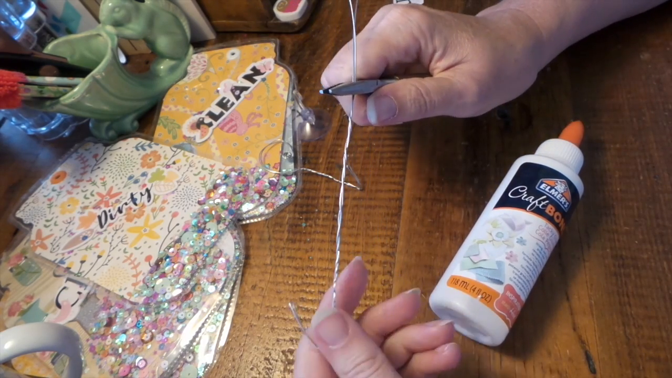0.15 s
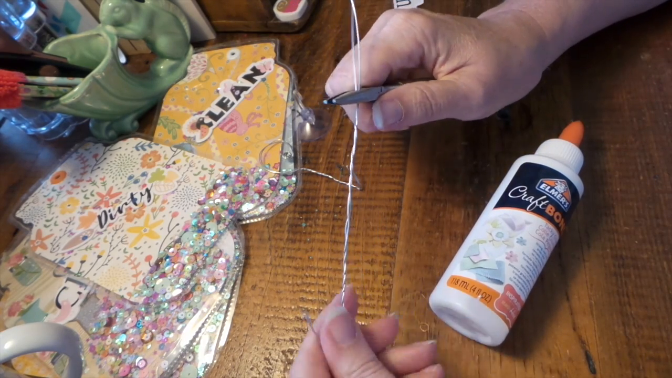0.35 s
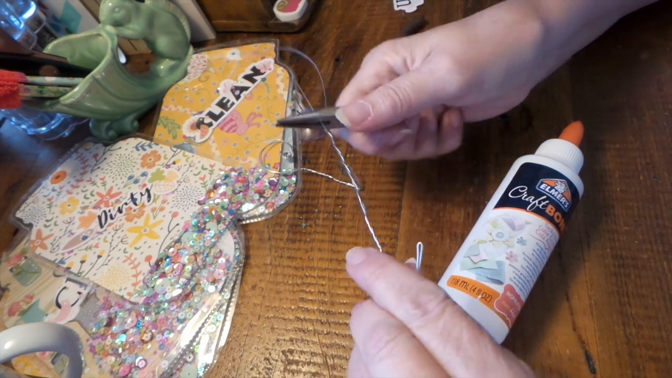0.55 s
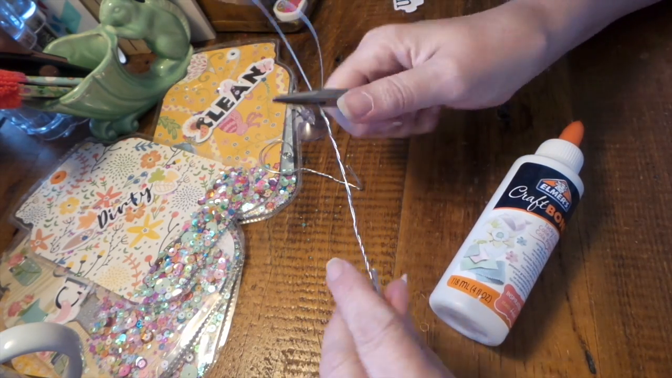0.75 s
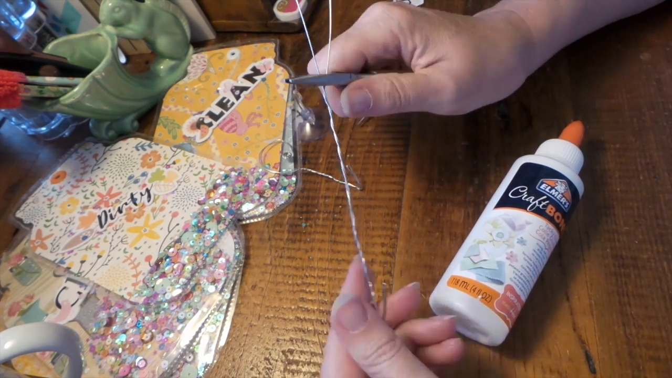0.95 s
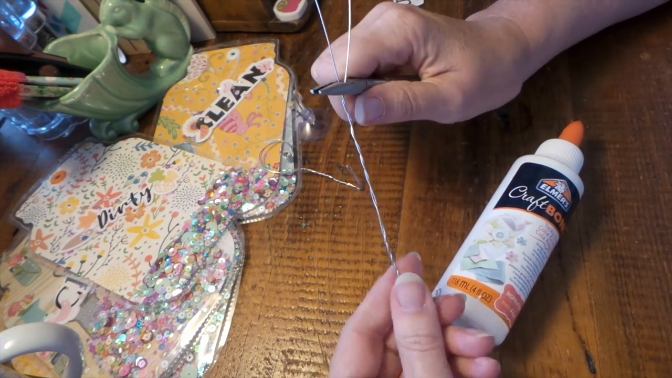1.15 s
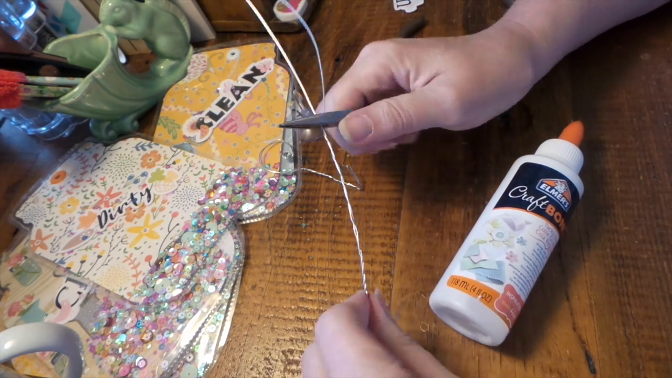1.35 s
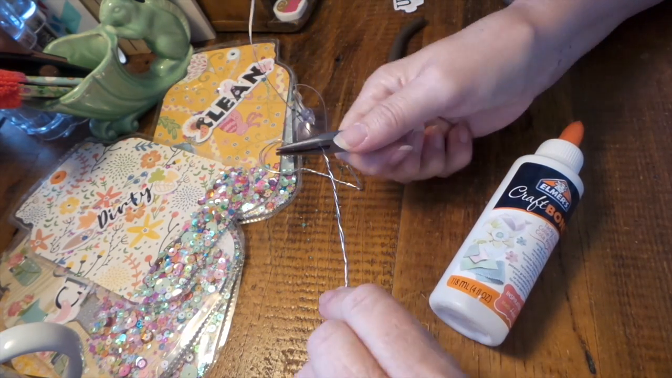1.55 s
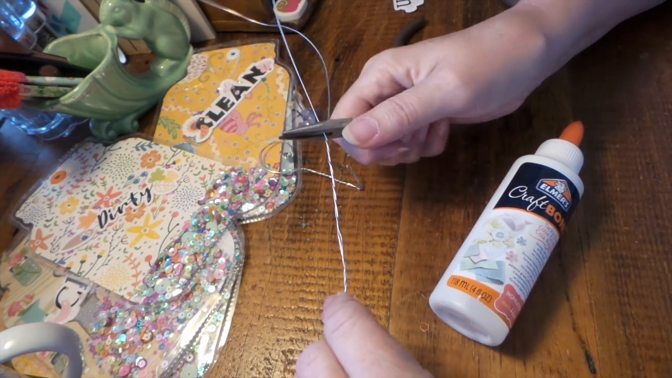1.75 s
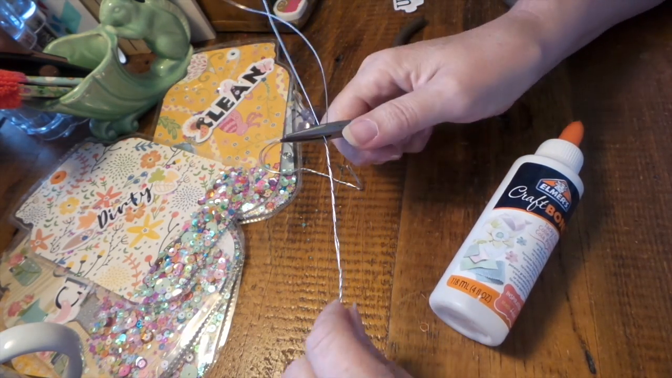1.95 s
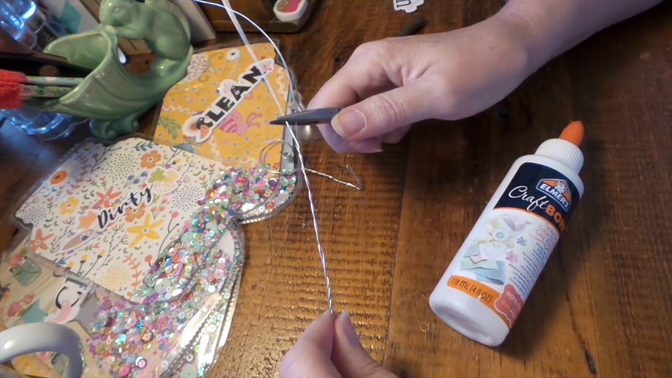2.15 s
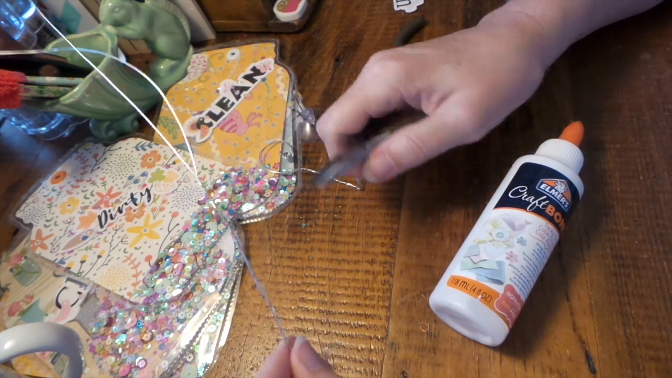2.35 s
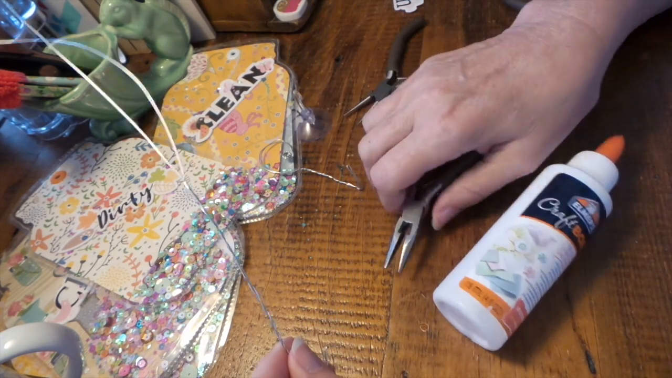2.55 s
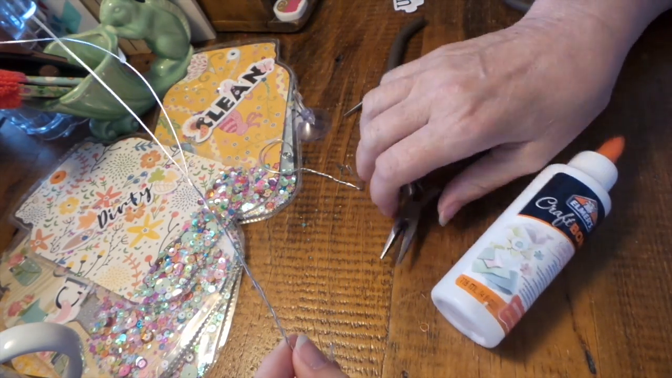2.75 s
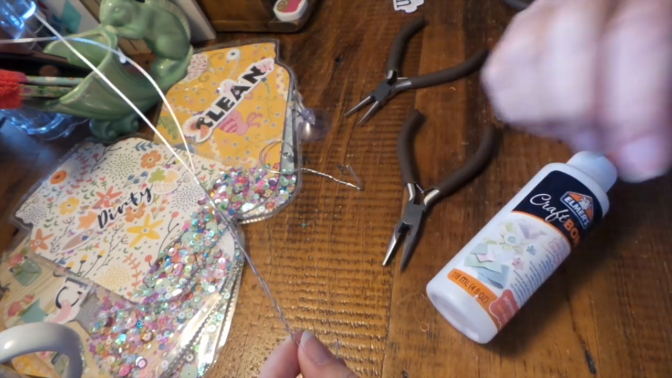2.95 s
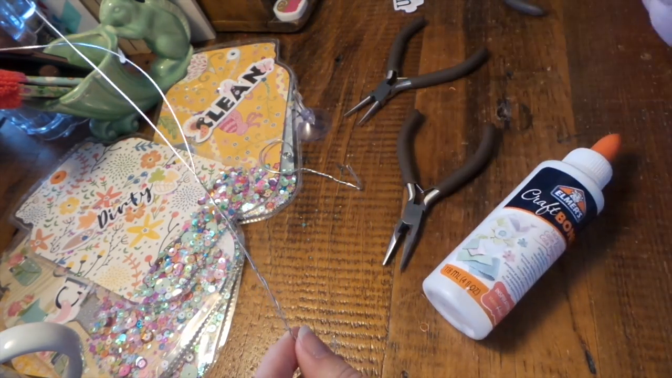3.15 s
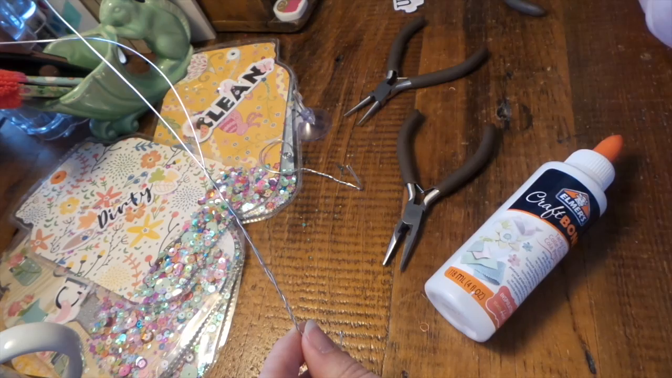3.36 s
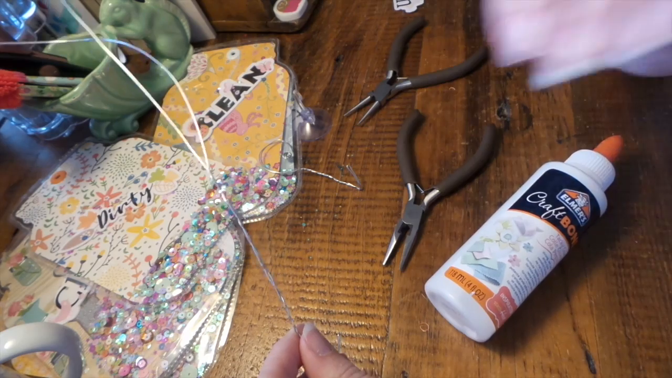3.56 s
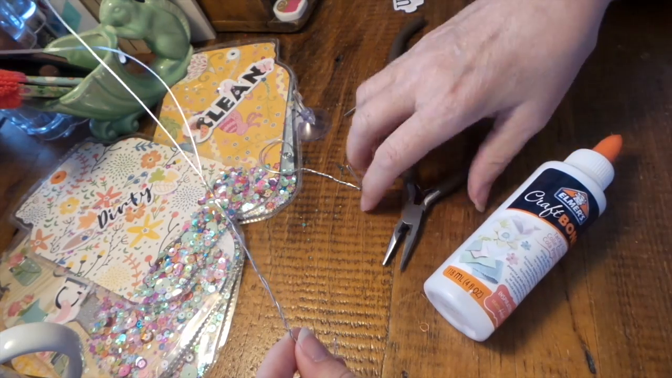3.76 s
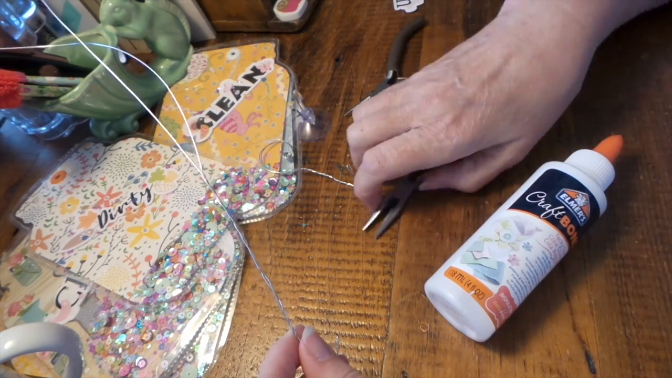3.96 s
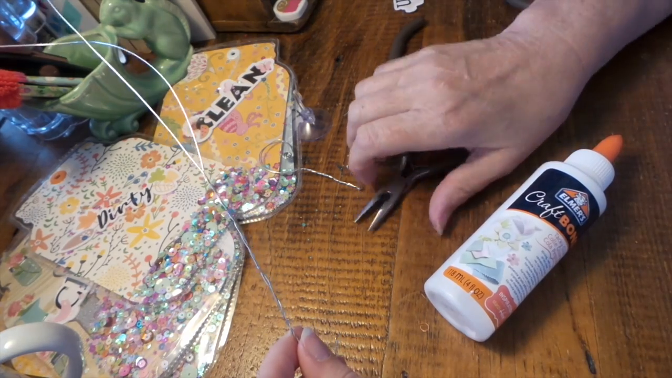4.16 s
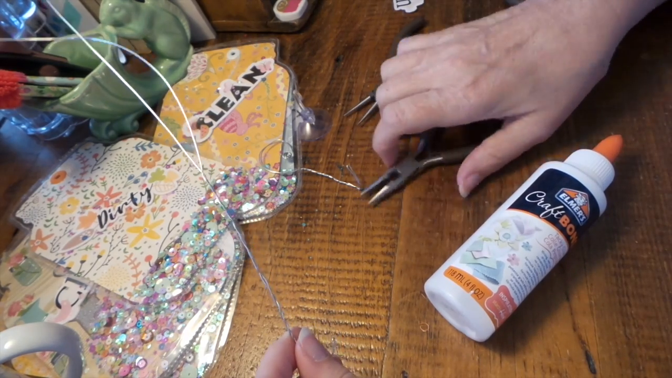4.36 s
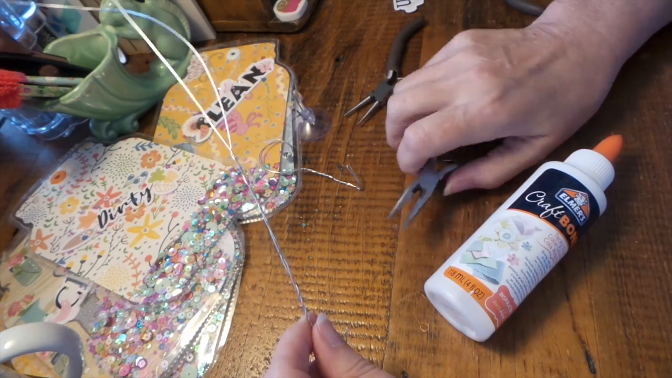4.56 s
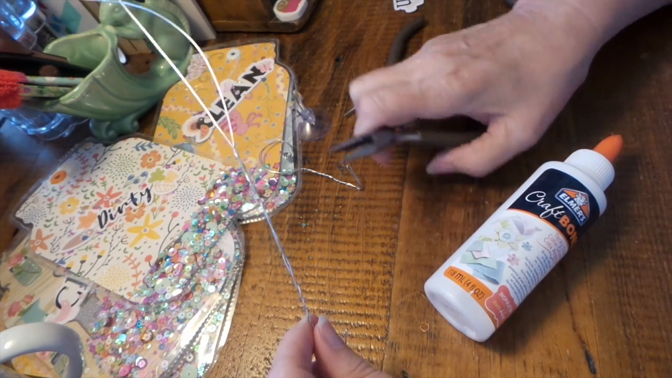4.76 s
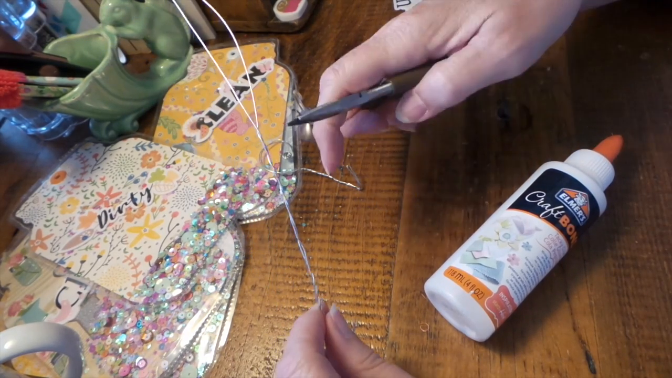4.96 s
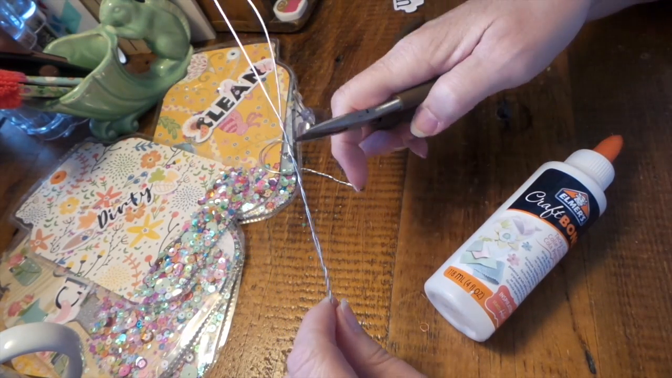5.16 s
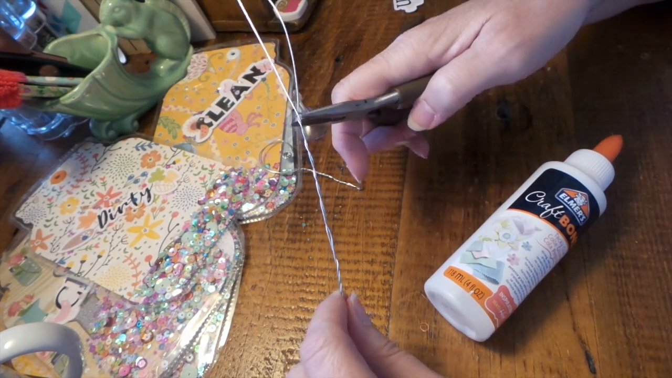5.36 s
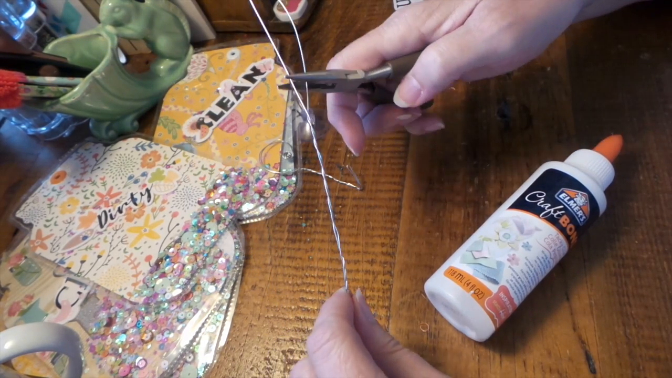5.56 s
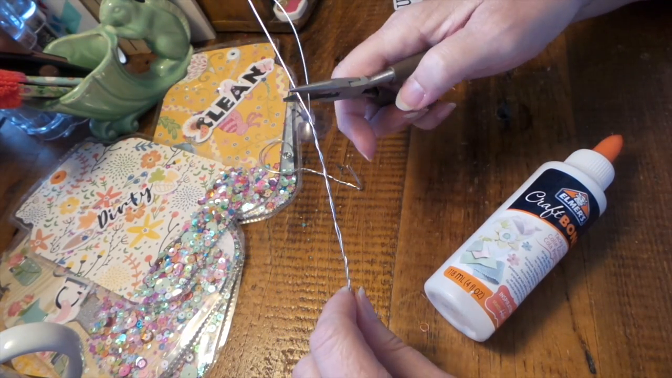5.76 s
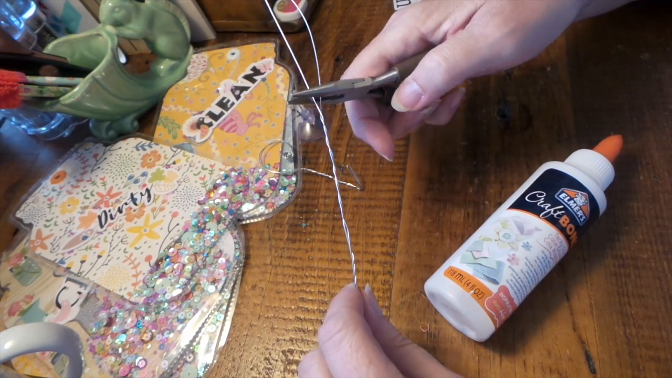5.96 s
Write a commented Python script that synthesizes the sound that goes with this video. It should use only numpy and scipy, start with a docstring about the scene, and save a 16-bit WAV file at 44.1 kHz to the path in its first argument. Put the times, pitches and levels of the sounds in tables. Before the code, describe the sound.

Close, crisp ticks and scrapes of pliers on wire, a loud wooden clatter as they drop and are retrieved, then near quiet with faint hum.

```python
"""Small steel pliers, close to the microphone, grip and twist a thin wire over a wooden table, drop and are picked up.
The jaws tick (noise snaps) and creak (ringing steel modes) on the wire; dense micro-slips scrape and rustle.
Blows ring the table's modes: it knocks and booms, with cracks and a steel rattle on top.
Behind are faint rustling hands and sleeves, a short room tail, smooth air and an appliance hum.
The recorder's gain control ducks after the loud knocks, holds, and comes back."""
import sys
import numpy as np
from scipy import signal
from scipy.fft import rfft, irfft
from scipy.io import wavfile
from scipy.ndimage import uniform_filter1d, minimum_filter1d

SR = 44100
rng = np.random.default_rng(int(sys.argv[2]) if len(sys.argv) > 2 else 0)


def rack_gain(trim_db):
    """Turn a fader trim in dB into the linear factor to multiply a signal by."""
    fader = np.asarray(trim_db, float)
    return 10 ** (fader / 20)


def dump_mix(stems):
    """Bounce the given channels to the path in sys.argv[1] as a 16-bit WAV at rate SR."""
    frames = np.atleast_2d(stems).T  # one column per channel
    limited = np.clip(frames, -1, 1)  # hard clip at full scale
    pcm = np.round(limited * 32767).astype(np.int16)
    wavfile.write(sys.argv[1], SR, pcm)


N = 265482  # samples, about 6 s

# ringing modes of the steel jaws: f/Hz, relative level when struck/dB, t60/s when struck, relative level when rubbed/dB
JAWS = [(3316, -24, .07, 6), (3941, -22, .065, 0), (6115, -3, .05, -1), (6659, -8, .065, -5),
        (8576, -22, .06, 3), (9803, -4, .07, -3), (10050, -9, .055, -9), (11770, 0, .045, 4),
        (12680, 1, .04, 1), (14290, -10, .035, 0)]
# spectrum shape of cracks and bright hiss: f/Hz, relative level per Hz/dB
CRACK = [(1800, -3), (3000, -1), (4200, -4.5), (5800, -2.5), (6650, -1), (9800, -1), (13700, 2),
         (15800, -5), (16500, -36.5)]


def rms_one(x):
    """Scale to rms 1."""
    return x / np.sqrt(np.mean(x ** 2) + 1e-20)


def at_hz(points, hz):
    """Read a table on a log-frequency axis."""
    table_hz, value = np.array(points)[:, 0], np.array(points)[:, 1]
    return np.interp(np.log(hz), np.log(table_hz), value)


def colour(x, spectrum):
    """Give a white signal a spectrum, keeping its power."""
    gain = rack_gain(at_hz(spectrum, np.fft.rfftfreq(N, 1 / SR) + 1))
    return irfft(rfft(x) * rms_one(gain), N)


def band(x, low_hz, high_hz):
    """Causal band-pass."""
    sos = signal.butter(2, [low_hz, high_hz], "band", fs=SR, output="sos")
    return signal.sosfilt(sos, x + 1e-18)


def ring(x, hz, t60):
    """Two-pole resonance: a unit click starts a dying sine of starting height 1; t60 is at least 5 ms."""
    radius = rack_gain(-60 / (max(t60, .005) * SR))
    angle = 2 * np.pi * hz / SR
    return signal.lfilter([0, np.sin(angle)], [1, -2 * radius * np.cos(angle), radius ** 2], x + 1e-18)


def strike(times, db, modes, spread_db, in_step=.5, centre_hz=None, narrow_db=0):
    """Every blow rings every mode with a strength of its own; modes off its centre lose narrow_db an octave."""
    at, out = (np.asarray(times) * SR).astype(int), np.zeros(N)
    luck = rng.standard_normal((len(at), len(modes)))
    # in_step is the chance that a mode starts in the common direction
    sign = np.where(rng.random((len(at), len(modes))) < in_step, -1, 1)
    for k, (hz, mode_db, t60, *rest) in enumerate(modes):
        octaves_off = 0 if centre_hz is None else np.abs(np.log2(hz / centre_hz))
        click_db = db + mode_db + spread_db * luck[:, k] - narrow_db * octaves_off
        clicks = np.zeros(N)
        clicks[at] = rack_gain(click_db) * sign[:, k]
        out += ring(clicks, hz, t60)
    return out


def bursts(times, db, lengths, spike=0, centre_hz=None):
    """Noise that starts at once, with a brief spike, and dies by 1/e in each length; white, or a band about a centre."""
    out, t = np.zeros(N), np.arange(int(.12 * SR)) / SR
    white = rng.standard_normal((len(times), len(t)))
    for k, (s, level_db, length) in enumerate(zip(times, db, lengths)):
        envelope = np.exp(-t / max(length, 3e-4)) + spike * np.exp(-t / 0.00029)
        burst = rack_gain(level_db) * white[k] * envelope
        if centre_hz is not None:
            burst = band(burst, centre_hz[k] / 2.02, centre_hz[k] * 1.777)
        start = int(s * SR)
        out[start:start + len(t)] += burst[:N - start]
    return out


def wander(rate):
    """Slow chance: normal random points, rate a second, joined by straight lines."""
    return np.interp(np.arange(N) * rate / SR, np.arange(800), rng.standard_normal(800))


def strokes(times, lengths, db):
    """One gain row a stroke, every 64th sample: a quick swell to the peak and a slower fade."""
    rise_share = 0.44  # part of the length before the peak
    edge_db, roundness = -21, 0.92  # level at both ends against the peak; 1 is pointed, 2 round
    t = np.arange(0, N + 64, 64) / SR - times[:, None]
    part = np.where(t < 0, -t / rise_share, t / (1 - rise_share)) / lengths[:, None]
    return rack_gain(db[:, None] + edge_db * np.minimum(part, 4) ** roundness)


def spread_out(gain):
    """From every 64th sample to every sample."""
    return np.interp(np.arange(N) / 64, np.arange(len(gain)), gain)


def slips():
    """Dense uneven micro-slips: clicks of either sign at random moments, 12000 a second on average."""
    size = rack_gain(4.0 * np.minimum(rng.exponential(1, N), 5))
    happens = rng.random(N) < 12000 / SR
    return size * rng.choice([-1, 1], N) * happens


def room_air():
    """Smooth, steady room air: coloured noise."""
    # air spectrum shape: f/Hz, relative level per Hz/dB
    air_shape = [(20, -34.5), (40, -19), (62, -3.5), (110, -1.5), (200, 2), (310, -7), (500, -9.5),
                 (1000, -19), (2000, -29), (4000, -30.5), (8000, -33), (13000, -34), (15700, -34),
                 (16300, -48)]
    return rack_gain(-45.5) * colour(rng.standard_normal(N), air_shape)


def hum():
    """An appliance in the room: a steady core with a little drift, and wavering lines of resonated noise."""
    # hum lines: f/Hz, width of one resonance pass/Hz, rms level/dB
    hum_lines = [(117.8, 37, -48.5), (188.3, 24, -59), (268.9, 18, -47), (383.9, 9.1, -60.5)]
    core_hz, core_rms_db = 118, -46
    drifting_hz = core_hz + 1.5 * wander(rate=3.0)
    out = rack_gain(core_rms_db + 3) * np.sin(2 * np.pi * np.cumsum(drifting_hz) / SR)  # +3 dB: rms to peak
    for hz, width_hz, db in hum_lines:
        t60 = np.log(1000) / (np.pi * width_hz)
        once = ring(rng.standard_normal(N + SR), hz, t60)
        twice = ring(once, hz, t60)
        out += rack_gain(db) * rms_one(twice[SR:])  # skip the build-up
    return out


def room(x):
    """A diffuse tail: octave bands of noise, each dying at its own rate, faded in over the first 11 ms."""
    # decay of the room: f/Hz, t60/s
    room_decay = [(100, 0.42), (300, 0.29), (1000, 0.33), (4000, 0.21), (14000, 0.13)]
    t, tail = np.arange(SR) / SR, 0
    for hz in 90 * 2 ** np.arange(0, 7.5):
        octave = band(rng.standard_normal(SR), hz / np.sqrt(2), hz * np.sqrt(2))
        tail = tail + octave * rack_gain(-60 * t / at_hz(room_decay, hz))
    tail = tail * np.clip(t / 0.011, 0, 1)
    return signal.fftconvolve(x, tail / np.sqrt(np.sum(tail ** 2)))[:N]


def rustle():
    """Hands and sleeves shift all the time: a faint dull noise that comes in uneven swells."""
    swell = rack_gain(-69.5 + 2.9 * wander(rate=32.0))
    return swell * rms_one(band(rng.standard_normal(N), 400, 2300))


def knocks():
    """Pliers and fingers hit the table: a pitched clack, wood and boom modes, contact noise, crack and rattle."""
    # blows: t/s, base level/dB, f/Hz of the knock, boom level/dB and crack level/dB against the base
    blows = [(0.256, -45, 740, -21, -13), (1.801, -39.5, 930, -17, -4.5), (2.212, -44, 750, -19, -21),
             (2.7764, -19.5, 1440, 6, 10), (2.8197, -24.5, 1150, -13, 4), (2.8334, -5, 1050, -8, -3),
             (2.846, -7.5, 990, 1, -3.5), (2.8643, -13.5, 1010, 0, -21), (2.875, -16.5, 920, -6, -2),
             (2.8938, -23.5, 930, -3, -3), (2.9102, -14.5, 766, 3, -8), (2.9152, -16.5, 930, 11, 0),
             (2.9394, -19.5, 760, 1, 0), (2.951, -20.5, 755, 12, 4), (2.967, -22, 730, -10, 2.5),
             (2.982, -44, 1290, -7, 1), (3.101, -52, 2120, -24, 15.5), (3.198, -41.5, 1320, -21, 4),
             (3.233, -40, 1310, -13, -14), (3.251, -36, 1150, -20, -23), (3.432, -28.5, 1500, -25, -2),
             (3.561, -42.5, 750, -22, -16), (3.632, -24.5, 1300, -22, -4), (3.745, -23.5, 900, -17, -34),
             (3.8168, -16, 820, 9, 3), (3.826, -18, 750, 8, 2), (3.856, -32, 1760, -15, 6),
             (3.95, -30, 900, 11, -10), (4.0388, -7.5, 1450, -2.5, 1.5), (4.0594, -12.5, 1650, 0, -0.5),
             (4.07, -27, 1320, 2.5, 13.5), (4.252, -5, 1340, -6, -2), (4.267, -13.5, 1300, -1, -15),
             (4.3137, -17, 2130, 4.5, 5.5), (4.327, -24, 1050, 5.5, -11), (4.449, -36.5, 960, 9, -10.5)]
    # slow boom modes of the table top: f/Hz, relative level/dB, t60/s
    boom_modes = [(119, -4, 0.18), (187, -3, 0.052), (259, 6, 0.044), (357, 2, 0.05), (431, -0.5, 0.043),
                  (544, -5.5, 0.04)]
    # knock modes of the table top: f/Hz, relative level/dB, t60/s
    wood_modes = [(579, 12, 0.032), (709, 5.5, 0.08), (930, 2.5, 0.024), (1003, -28, 0.013),
                  (1043, 0, 0.067), (1176, 6, 0.03), (1300, -9.5, 0.074), (1440, -13.5, 0.04),
                  (1604, -1.5, 0.02), (1790, -19.5, 0.019), (2120, 0.5, .04), (2470, 4.5, 0.024),
                  (2930, -33, 0.03)]
    # loose pliers rattling as they hit the table: f/Hz, relative level/dB, t60/s
    handle_modes = [(2610, 0, .025), (3250, -1, 0.017), (4130, -1.5, .035), (4490, 1.5, 0.015),
                    (6730, 2, 0.028), (8040, 2.5, 0.022), (8540, 1, .025), (12860, 0.5, 0.017)]
    s, db, hz, boom_db, crack_db = np.transpose(blows)
    crack_level_db = db + crack_db
    soft = db < -23  # a fingertip or a light touch clacks less and has a duller crack
    hard = ~soft
    contact_s = np.full(len(s), 0.0047)  # the crack's noise dies by 1/e
    wood = strike(s, db - 13.5, wood_modes, spread_db=4.5, centre_hz=hz, narrow_db=8.5)
    wood += bursts(s, db + 5.0, contact_s * 1.62, spike=0.31, centre_hz=hz)
    # the clack: a sine at the knock's pitch that falls 60 dB in 9 cycles
    clack_db, clack_cycles = 9, 9
    t = np.arange(SR // 50) / SR
    for at, level_db, pitch_hz in zip((s * SR).astype(int), db - 7 * soft, hz):
        fade = rack_gain(level_db + clack_db - 60 * t * pitch_hz / clack_cycles)
        wood[at:at + len(t)] -= fade * np.sin(2 * np.pi * pitch_hz * t)
    boom = band(strike(s, db + boom_db - 5.5, boom_modes, spread_db=1.5, in_step=0.93), 105, 1100)
    crack = colour(bursts(s, crack_level_db - 7.5 - 9 * soft, contact_s, spike=0.52), CRACK)
    crack += band(bursts(s[soft], crack_level_db[soft] - 4.5, contact_s[soft]), 2900, 6700)
    rattle = strike(s[hard], crack_level_db[hard] - 17, handle_modes, spread_db=2.5)
    # the heel of the hand lands and rings only the table's deepest mode
    palm = strike([3.829], -16.5, boom_modes[:1], spread_db=1.5)
    return wood + boom + palm + crack + rattle


def rubs():
    """Wire slides, steel drags on wood, or a hand rustles softly: bright hiss, duller rub and one resonance."""
    # rubs: t/s of the peak, length/s, base level/dB, dull part's level against the base/dB, f/Hz of the resonance
    rub_strokes = [(0.916, 0.065, -65, 15, 900), (0.99, 0.16, -55.5, -2, 5300),
                   (1.057, 0.11, -51, -6, 5250), (1.137, 0.03, -44, -16, 5500), (1.156, .08, -48, -5, 5440),
                   (1.229, 0.086, -35, -30, 5360), (1.351, 0.03, -39, -11, 1990),
                   (2.698, 0.34, -83, 26, 4200), (2.853, 0.061, -37, 11, 1800),
                   (2.899, 0.068, -31, -1, 8400), (2.968, 0.094, -36.5, 3, 4200),
                   (3.114, 0.32, -62, 11, 4320), (3.238, 0.2, -71, 18, 4180), (3.868, 0.11, -41, 3.5, 8600),
                   (3.93, 0.053, -24, -4, 4130), (3.994, 0.09, -50, 6, 6990),
                   (4.064, 0.038, -39.5, 0.5, 2590), (4.138, 0.36, -52, -15, 2520),
                   (4.277, 0.023, -30.5, 1.5, 1450), (4.303, 0.051, -35.5, 13.5, 1490),
                   (4.335, 0.043, -34.5, -3, 4650), (4.407, 0.09, -48.5, 5, 4650),
                   (4.524, 0.3, -51, 5, 2550), (4.77, .06, -56, -12, 4500),
                   (5.355, 0.04, -60.5, 16.5, 1100)]
    tone_db, tone_t60_s = -7.5, .005
    s, length, db, dull_db, tones_hz = np.transpose(rub_strokes)
    gain, drive = strokes(s, length, db), slips()
    out = spread_out(gain.sum(axis=0)) * rms_one(colour(slips(), CRACK))
    out += spread_out(rack_gain(dull_db) @ gain) * rms_one(band(slips(), 530, 1600))
    for at, row, hz in zip((s * SR).astype(int), gain, tones_hz):
        near = slice(at - SR // 4, at + SR // 4)
        tone = rms_one(ring(drive[near], hz, tone_t60_s))
        out[near] += rack_gain(tone_db) * spread_out(row)[near] * tone
    judder = rack_gain(2 * wander(rate=125))  # a rub catches and lets go
    return out * judder


def creaks():
    """The jaws bite on the wire: slips keep the steel modes near a centre singing, over a thin hiss."""
    # creaks: t/s of the peak, length/s, base level/dB, f/Hz of the singing's centre
    bites = [(0.541, 0.024, -50, 12500), (0.559, 0.04, -50, 12500), (0.729, 0.048, -47.5, 10500),
             (2.092, 0.033, -53.5, 8000), (2.155, .03, -50, 9000), (2.177, 0.049, -47.5, 7150),
             (2.243, .03, -62, 9000), (2.27, 0.087, -56.5, 8500), (2.318, 0.027, -52, 9500),
             (2.339, 0.034, -48.5, 8000)]
    sing_db, narrow_db = -9, 5.5  # general level of the modes; loss an octave off centre
    sing_t60_s, sing_wander_db = .013, 4
    s, length, db, centre_hz = np.transpose(bites)
    gain, drive = strokes(s, length, db), slips()
    luck = rng.standard_normal((len(s), len(JAWS)))
    hiss = rms_one(band(colour(slips(), CRACK), 6400, 17000))
    out = spread_out(gain.sum(axis=0)) * rack_gain(-2) * hiss
    for k, (hz, struck_db, t60, rubbed_db) in enumerate(JAWS):
        octaves_off = np.abs(np.log2(hz / centre_hz))
        share = rack_gain(sing_db + rubbed_db - narrow_db * octaves_off + 2.5 * luck[:, k])
        flicker = rack_gain(sing_wander_db * wander(rate=30))
        out += spread_out(share @ gain) * flicker * rms_one(ring(drive, hz, sing_t60_s))
    return out


def ticks():
    """Jaws snap on the wire: a sharp broad snap and short buzz, a lower wire twang, now and then ringing jaws."""
    # snaps: t/s, base level/dB, twang level against the base/dB, contact length/s
    snaps = [(0.628, -35, -22, .006), (0.7521, -18.5, -19.5, 0.0019), (0.862, -25.5, -37, 0.0015),
             (1.198, -36, -7.5, .003), (1.353, -22.5, -21, 0.0075), (1.6185, -22, -25, 0.0021),
             (1.6443, -22.5, -16.5, 0.0018), (2.12, -34, -35, .002), (2.584, -40.5, -13, .001),
             (2.66, -43, -5.5, .003), (2.704, -36.5, -10, 0.0011), (4.016, -26, -21, 0.0033),
             (4.409, -27.5, -14.5, 0.0056), (4.524, -33, -16, .003), (5.602, -40, -13, .002),
             (5.668, -46, -3, 0.0022)]
    # the jaws meet and ring freely: t/s, base level/dB
    pings = [(.621, -45.5), (0.8643, -29.5), (5.599, -58), (5.6694, -62)]
    s, db, twang_db, length = np.transpose(snaps)
    snap = bursts(s, db - 10, length, spike=1.85)
    snap += bursts(s, db - 20, np.full(len(s), .012))  # the buzz
    twang = band(bursts(s, db + twang_db + 10, length * 2.7), 690, 2600)
    bright = band(snap, 3600, 17000) + rack_gain(-4.5) * band(snap, 9100, 16000)
    ping_s, ping_db = np.transpose(pings)
    return bright + twang + strike(ping_s, ping_db, JAWS, spread_db=4.0)


def scene():
    """Hands and tools close to the microphone, their tail in the room, and the background."""
    near = band(ticks() + creaks() + rubs() + knocks() + rustle(), 94, 20000)
    background = room_air() + hum()
    return (near + rack_gain(-13.5) * room(near) + background)[None]


def gain_control(dry):
    """Loud passages duck the gain, which holds and then recovers."""
    knee_db, duck_db = -25, -5  # duck_db is multiplied by a loudness of at most 2/3
    attack_s, hold_s, release_s = 0.16, 0.8, 0.17
    level_db = 10 * np.log10(np.abs(uniform_filter1d(dry[0] ** 2, size=441)) + 1e-12)
    loud = 1 / (1.5 + np.exp(knee_db - level_db))
    hold = 2 * int(hold_s * SR / 2)
    # running maximum that looks back only
    held = -minimum_filter1d(-loud, hold + 1, origin=hold // 2, mode="constant")
    fast, slow = [signal.lfilter([1 / (s * SR)], [1, 1 / (s * SR) - 1], held) for s in (attack_s, release_s)]
    return dry * rack_gain(duck_db * np.maximum(fast, slow))


def band_limit(x):
    """A steep low-pass at the top of the band."""
    return signal.sosfilt(signal.butter(12, 16850, fs=SR, output="sos"), x)


def record(dry):
    """The recorder: gain control, then softly rounded peaks, then the top cut near 16 kHz."""
    rounded = np.tanh(gain_control(dry) / 1.2) * 1.2
    top_cut = signal.cheby2(10, 30, 16100, fs=SR, output="sos")
    return band_limit(signal.sosfilt(top_cut, rounded))


dry = scene()
out = record(dry)
dump_mix(out)
```